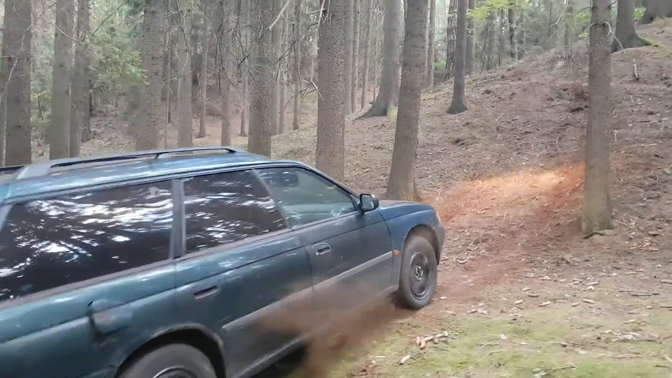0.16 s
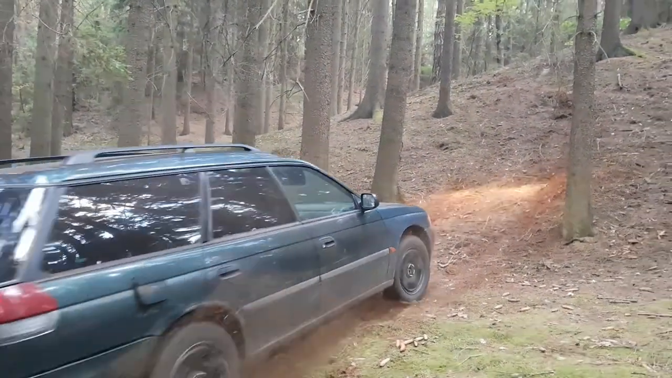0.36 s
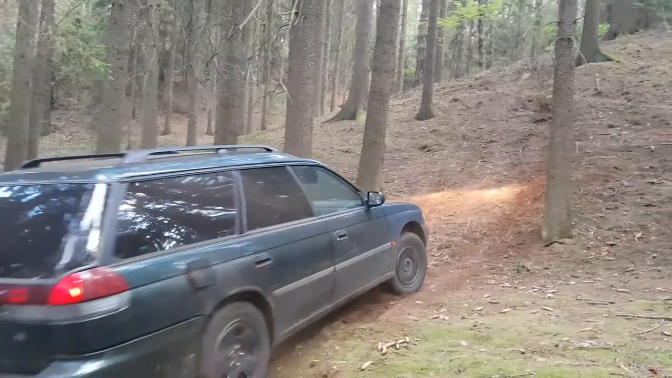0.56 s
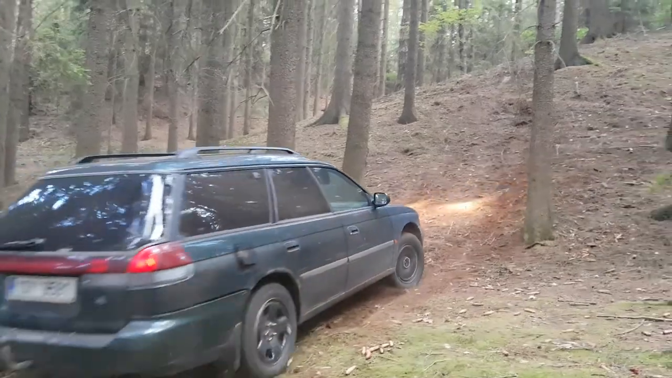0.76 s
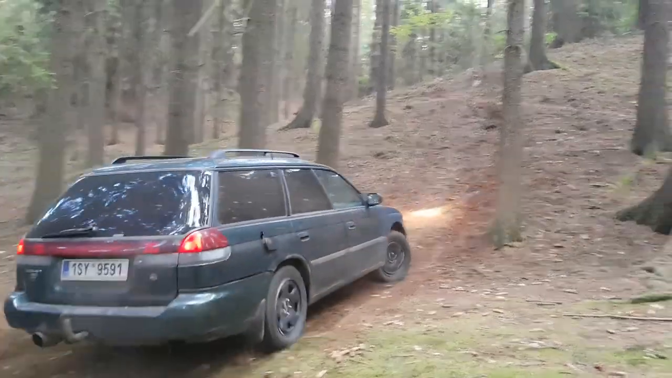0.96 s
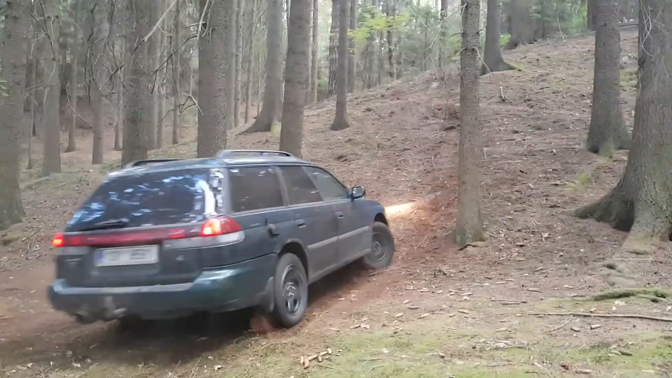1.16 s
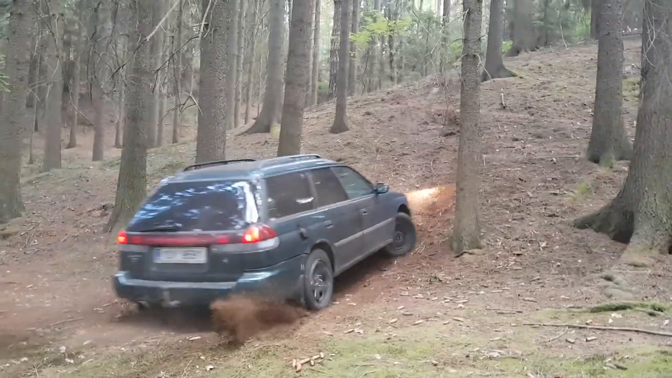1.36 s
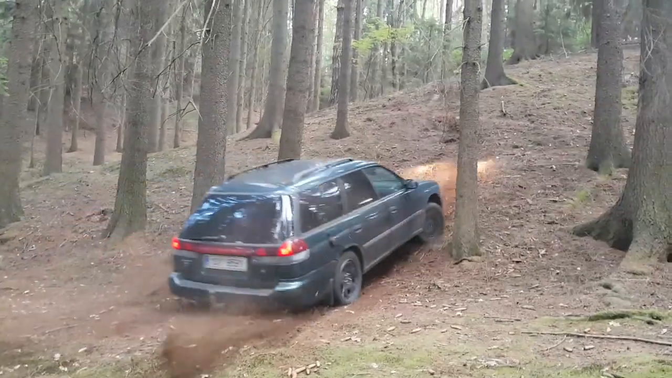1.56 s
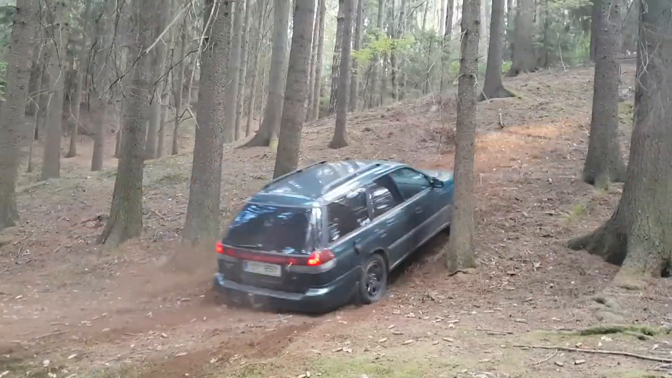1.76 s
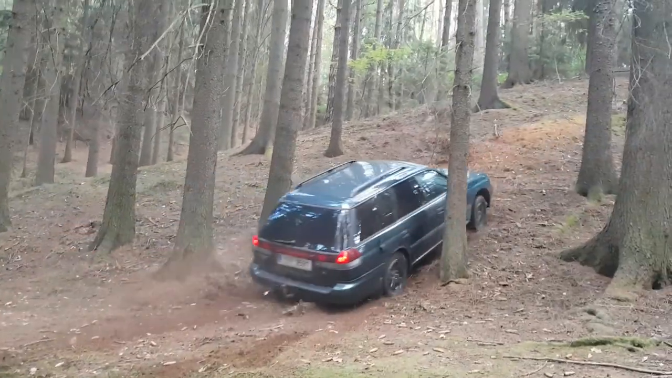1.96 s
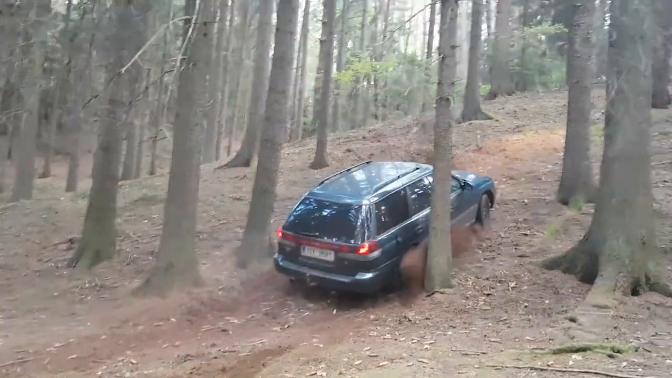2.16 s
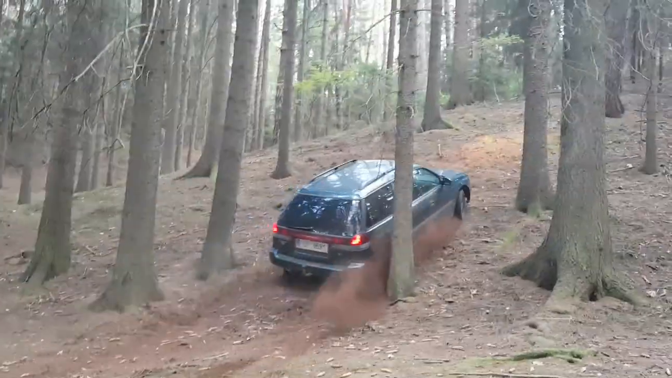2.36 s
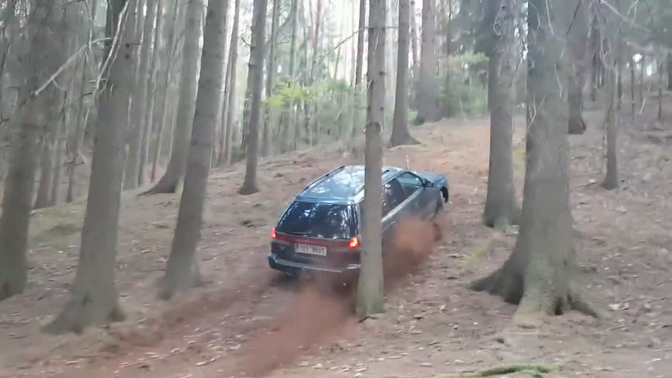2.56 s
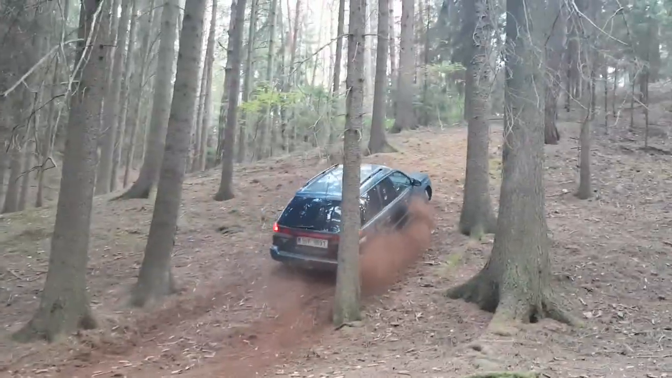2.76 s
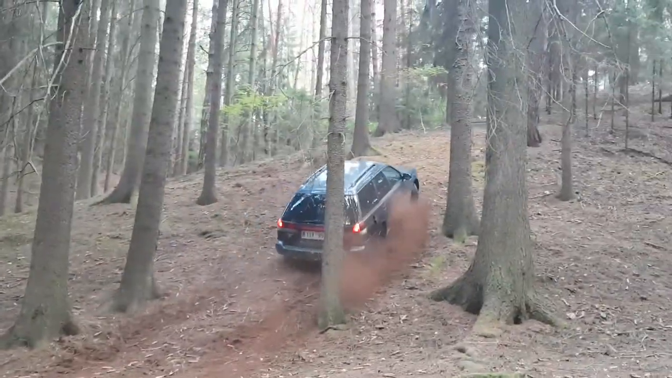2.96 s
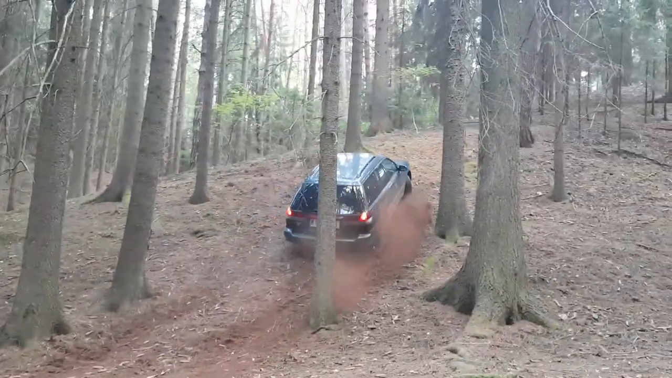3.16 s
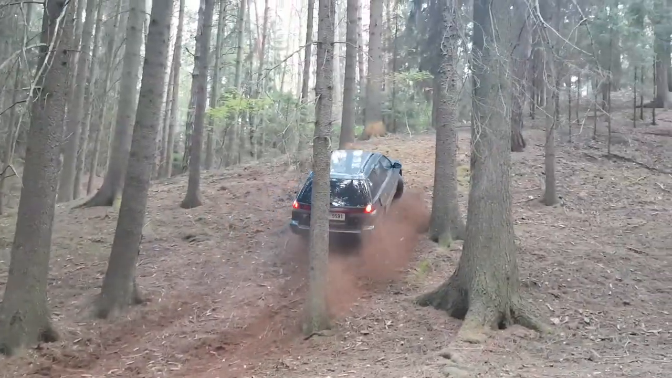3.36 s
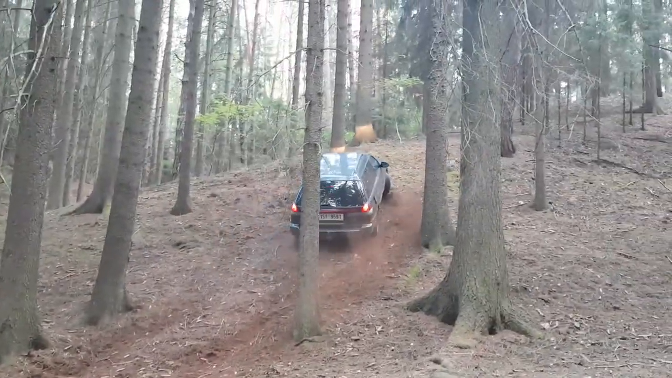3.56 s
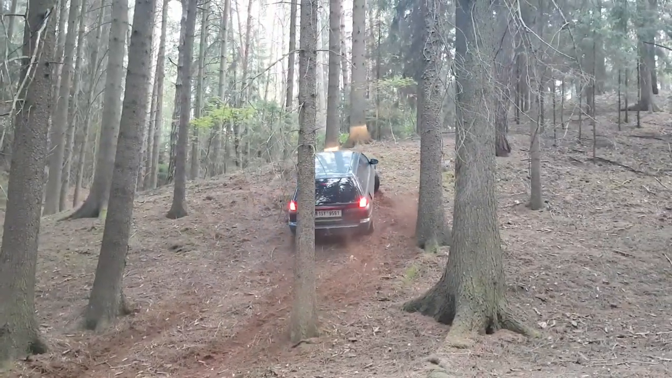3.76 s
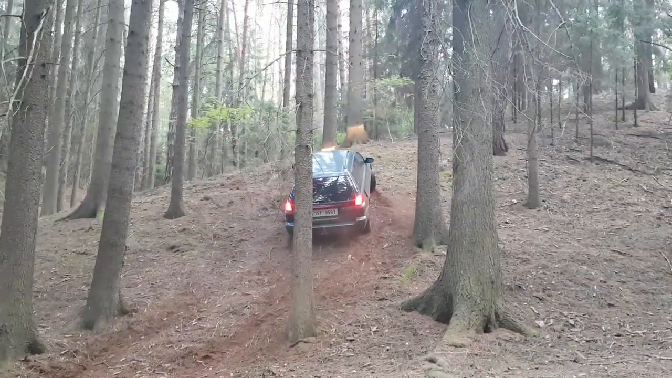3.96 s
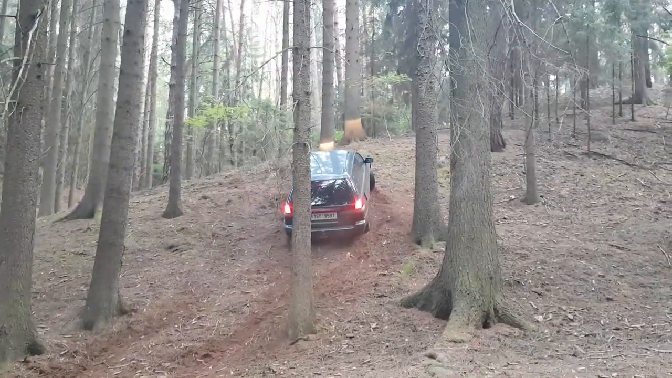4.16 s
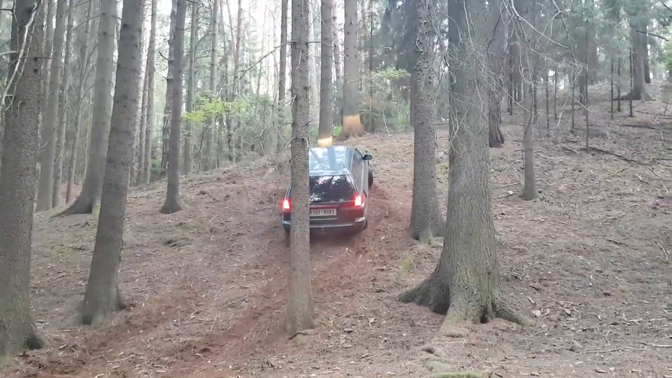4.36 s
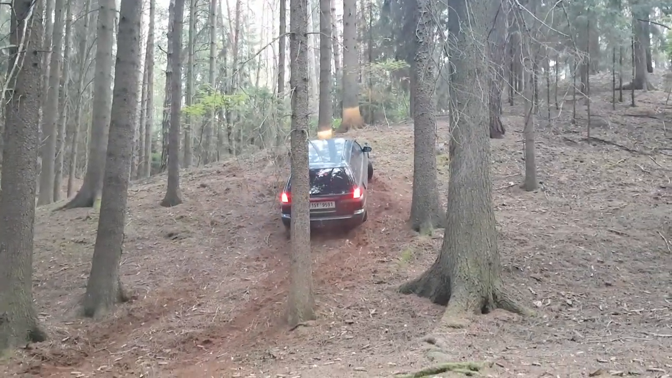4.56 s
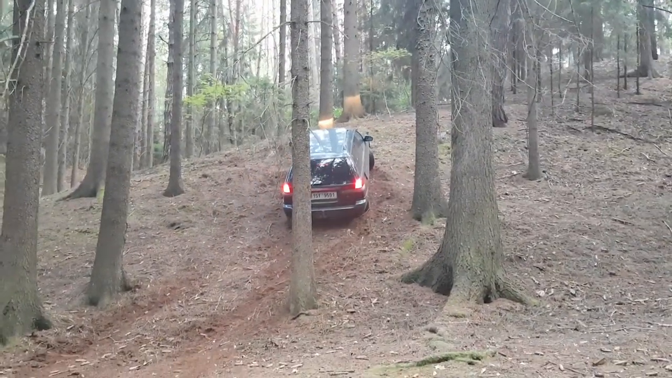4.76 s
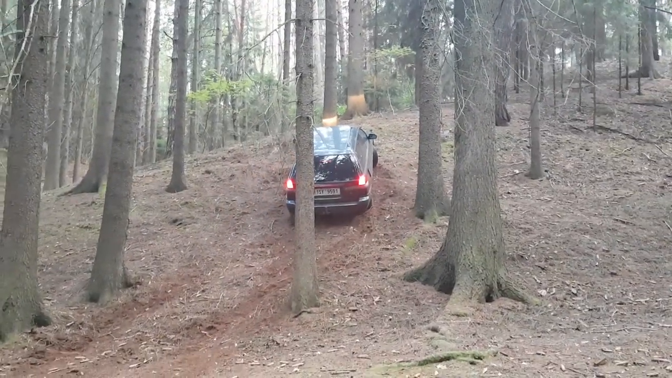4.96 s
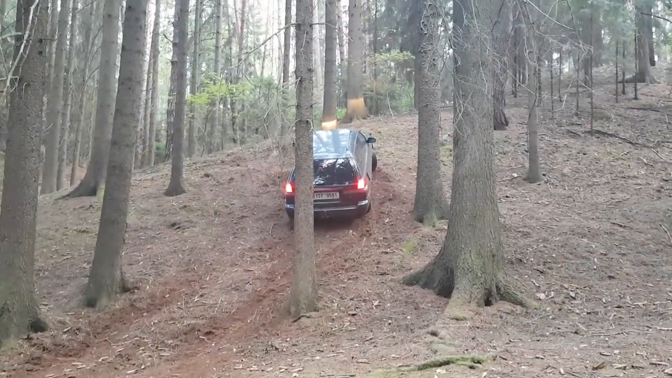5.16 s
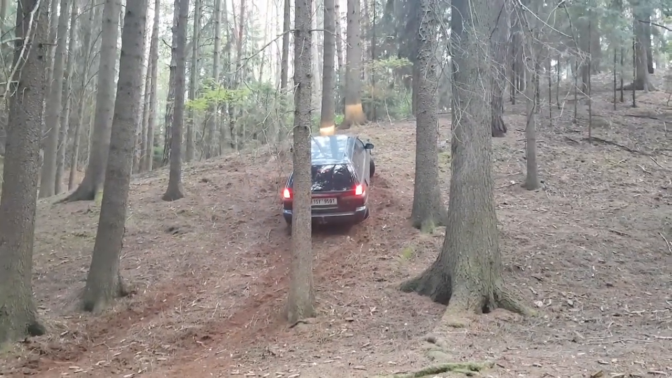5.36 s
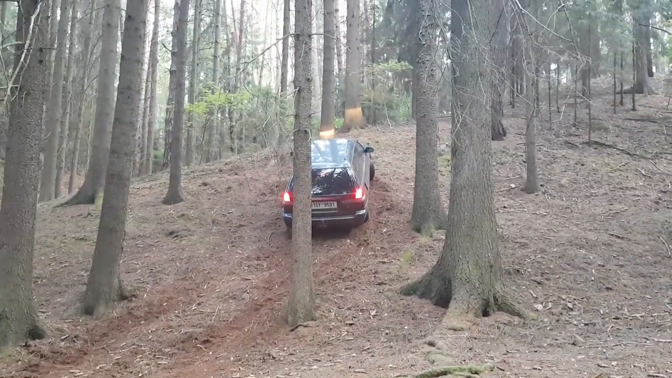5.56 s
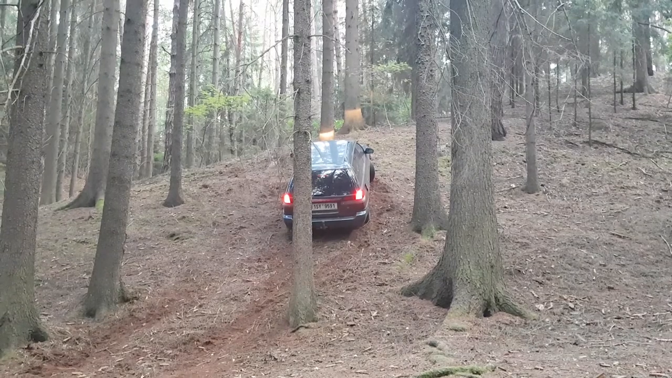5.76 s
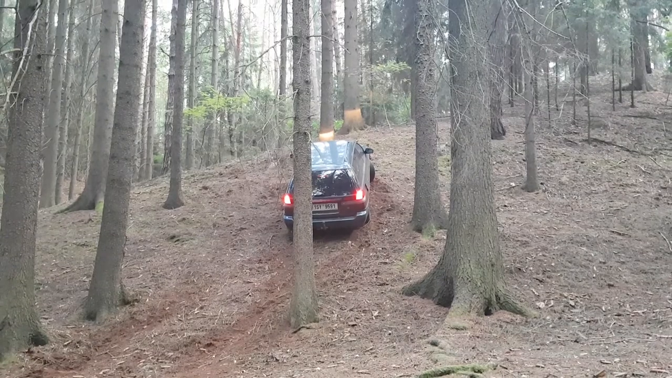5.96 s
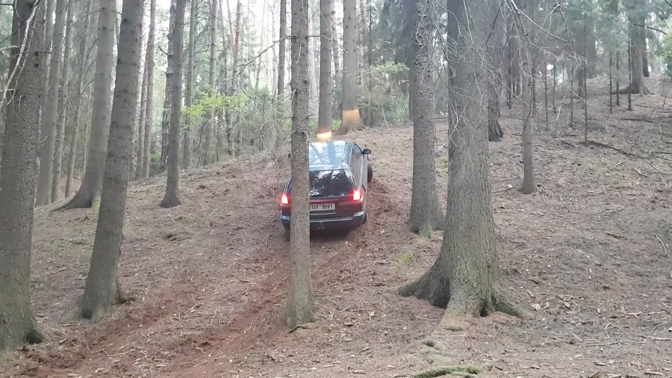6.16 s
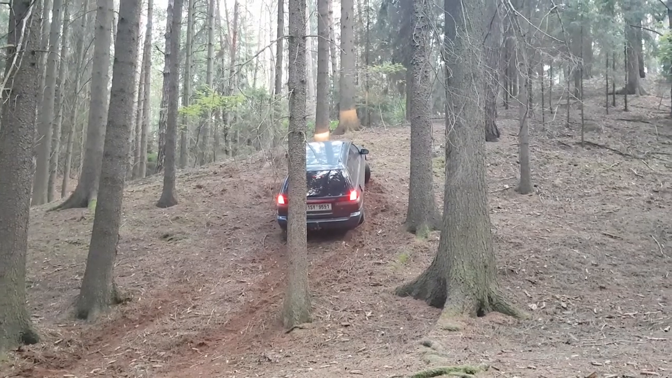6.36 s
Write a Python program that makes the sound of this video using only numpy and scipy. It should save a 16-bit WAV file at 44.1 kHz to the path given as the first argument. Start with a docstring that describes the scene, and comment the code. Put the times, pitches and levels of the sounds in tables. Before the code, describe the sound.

Outdoors among trees, a phone picks up a hard-revving car passing from the left to straight ahead. Deep, uneven exhaust drone, engine-bay roar and hissing dirt dominate, with one very brief lift of the throttle. Then the noise drops away, the pitch slides down, after-fire pops and valve clatter are heard, a faint belt squeak follows, and the engine lugs almost to a stop over faint air hiss.

```python
"""A flat-four estate car charges up a forest slope at full throttle, from the left to straight ahead:
firing harmonics boom and bark while gated noise makes the rasp, the engine-bay roar and wheels spinning in soil.
The foot lifts once for a moment, then the throttle shuts; revs sink as single firings ring the silencer,
with dull pops, sputter, valve clatter and pattering soil, until the engine lugs and barely ticks over.
A phone's two microphones hear it over a faint hiss of air, with a short echo from the trunks."""
import sys
import numpy as np
from scipy import signal
from scipy.fft import rfft, irfft, next_fast_len
from scipy.io import wavfile
from scipy.ndimage import uniform_filter1d, map_coordinates

SR = 44100
rng = np.random.default_rng(int(sys.argv[2]) if len(sys.argv) > 2 else 0)


def unload_audio(sound):
    """Save the sound as a 16-bit wav file, at the path given as the first command line argument."""
    columns = np.transpose(np.atleast_2d(sound))
    # keep every value between -1 and 1, then stretch to whole-number steps
    steps = np.round(np.clip(columns, -1, 1) * 32767)
    wavfile.write(sys.argv[1], SR, steps.astype(np.int16))


N = 282681
T = np.arange(N) / SR

# Engine speed in the charge and the run-down. Each row: time in seconds, four-stroke cycles per second
# in Hz; there are four firings a cycle.
CHARGE = [(0.0, 39.8), (0.37, 43.6), (0.59, 43.9), (0.89, 46.2), (1.24, 44.8), (1.32, 45.5), (1.51, 45.0),
          (1.66, 47.3), (1.77, 47.8), (1.99, 51.2), (2.45, 47.9), (2.67, 45.3), (3.05, 43.8), (3.2, 42.6)]
RUN_DOWN = [(3.3, 39.9), (3.6, 28.2), (4.03, 23.5), (4.18, 23.2), (4.8, 16.7), (4.92, 16.6), (5.22, 13.2),
            (5.75, 9.4), (6.2, 6.4), (6.41, 5.8)]
# Throttle. Each row: time in seconds, opening from 0 to 1.
THROTTLE = [(0, 0.99), (3.22, 1), (3.27, 0.3), (4.55, 0), (4.9, 0), (5.48, 0.16), (5.53, 0)]
# Cylinders in firing order. Each row: strength in dB, full header delay in ms.
CYLINDERS = [(-1, 0.2), (-2.5, 0.042), (-2, 0.62), (-3.5, 0.92)]
# Exhaust tone under load; the quarters come from unequal headers. Each row: multiple of the firing rate,
# level in dB relative to its neighbours around the same harmonic.
TONE = [(0.25, -55), (0.5, -20.5), (0.75, -7.3), (1, 0.5), (1.25, -22.5), (1.5, -22.0), (1.75, -26),
        (2, -18.0), (2.25, -35.5), (2.5, -32), (2.75, -26.5), (3, -21.5), (3.25, -28.5)]
# Bark of the open throttle. Each row: time in seconds, second firing harmonic in dB, third in dB.
BARK = [(0.0, -16, -28.5), (0.3, -21, -38), (1.2, -23.5, -48.5), (1.58, -24.5, -27), (2.02, -25, -26),
        (2.5, -32.5, -47), (3.18, -28.5, -37.5), (3.5, -42, -44.5)]
# Clean overtones as the revs turn and sink. Each row: time in seconds, second firing harmonic in dB,
# fourth in dB.
OVERTONES = [(3.0, -68, -55), (3.15, -64.5, -27), (3.23, -67, -28.5), (3.28, -44, -48.5), (3.39, -35, -30),
             (3.55, -30.5, -46), (3.88, -22, -56.5), (3.98, -72, -78)]
# Noise under power, until the throttle shuts; the foot's dips come on top. Each row: time in seconds,
# pipe rasp in dB, engine-bay roar in dB, tyre scrub in dB.
EFFORT = [(0.0, -33.5, -31.5, -36), (0.35, -25, -27.5, -30.5), (0.68, -27.5, -30, -28),
          (0.92, -21, -29.5, -28.5), (1.5, -27.5, -32.5, -29), (1.85, -32, -32, -34), (2.08, -34, -28, -27),
          (2.33, -27.5, -25.5, -30), (3.05, -26.5, -30.5, -33.5), (3.21, -29.5, -36.5, -41),
          (3.28, -37, -32.5, -41)]
# The wheels dig in and throw up soil. Each row: time of the height in seconds, half length in seconds,
# boost in dB (dust takes all of it, coarse soil a share).
THROWS = [(0.76, 0.31, 5), (1.115, 0.077, 6.5), (1.34, 0.025, 6), (1.62, 0.09, 7), (1.858, 0.18, 8.5),
          (2.418, 0.21, 4)]
# After-fire in the silencer. Each row: time in seconds, relative level of the pipe's ring in dB,
# relative level of the thump in dB.
POPS = [(3.241, -24, -15.5), (3.284, -22, -6.5), (3.914, -23, -10.5), (3.933, -38, -9), (4.03, -29, -10.5),
        (4.091, -24, -3.5), (4.159, -38.5, -10.5), (4.247, -37, -8), (4.528, -25.5, -4),
        (4.623, -36.5, -17.5), (4.804, -45, -17)]
# Sharp clicks and a dull knock. Each row: time in seconds, peak in dB before colouring, ring in Hz,
# decay in seconds.
CLICKS_AND_KNOCKS = [(3.6198, -13, 700, .0001), (3.996, -34.5, 1160, 0.0047), (3.997, -31.5, 2560, 0.0066)]
# A spinning tyre digs itself a rut and its hiss sinks. Each row: time in seconds, centre in Hz, level in dB.
RUT = [(1.9, 5200, -52), (2.02, 4100, -33), (2.12, 2688, -35), (2.33, 1507, -32), (2.56, 1203, -41)]
# The suspension thuds over roots. Each row: time in seconds, half length in seconds, level in dB.
THUDS = [(0.1, .08, -36), (2.03, .025, -31), (2.609, 0.026, -28.5)]
# The last crumbs patter down. Each row: time in seconds, level in dB.
PATTER = [(3.2, -67), (3.8, -67.5), (4.25, -72.5), (4.9, -85.5)]
# A brief belt squeak as the revs collapse. Each row: time in seconds, pitch in Hz, level in dB.
SQUEAK = [(5.49, 1700, -100), (5.52, 1730, -59), (5.66, 1650, -62), (5.78, 1570, -78)]
# Bearing of the car. Each row: time in seconds, delay to the right microphone in ms,
# delay of a second path around the phone's body in ms.
BEARING = [(0, 0.27, 0.14), (.6, 0.25, .16), (1.1, 0.18, 0.17), (1.6, 0.073, 0.23), (2.1, 0.0096, 0.25),
           (3.2, 0.0022, 0.24)]
# The left microphone against the right. Each row: frequency in Hz, difference in dB.
PORTS = [(60, -0.5), (110, -1.5), (200, -1.0), (380, -0.5), (700, 1), (1290, 2), (2380, 9), (4400, 2.5),
         (8120, 2), (15000, 9.5)]

# Tone colours of the sources. Each row: frequency in Hz, gain in dB.
SILENCER = [(25, -33), (42, -10.5), (54, -16), (72, 3), (92, 1.5), (112, 6), (140, 4), (165, -2.5),
            (190, -12.5), (240, -20.5), (290, -60), (350, -65), (430, -53), (520, -61.5), (590, -37.5),
            (760, -59.5), (1500, -92.5)]
TAILPIPE = [(240, -5), (340, -24), (430, -3), (500, -8), (585, 5.5), (680, -4), (850, -15.5), (1400, -51)]
RASP = [(250, -36.5), (430, -5), (540, 5.5), (660, 13.5), (780, 13.5), (950, 5.5), (1400, -36)]
ROAR = [(450, -40.5), (800, -2), (1050, 9), (1400, 6.5), (1850, 0.5), (2700, -38)]
CLATTER = [(500, -14), (820, -7.5), (1020, 7.5), (1300, -0.5), (1800, 1), (2800, -6.5), (3800, -15.5),
           (5500, -21.5), (8000, -26), (10000, -34)]
SCRUB = [(1200, -14.5), (1900, 0), (2500, 1), (3100, -3.5), (4000, -8.5), (5200, -18), (8000, -44)]
SOIL = [(2800, -23), (4700, 9), (6300, 9.5), (7900, 5.5), (9300, -10.5), (12000, -30.5)]
DUST = [(7000, -33), (9500, -4), (12500, -4.5), (15500, -5.5)]
AIR = [(30, 7.5), (150, 11.5), (260, 18), (330, 21), (420, 16), (1000, 10.5), (2500, 11.5), (4500, 2.5),
       (9000, -4.5), (12500, 2), (15500, 1)]
GAS = [(20, -16), (50, -13.5), (90, -10.0), (170, 2.5), (260, -9), (340, -24), (450, -17),
       (900, -44.0), (3000, -80.0)]
POP_RING = [(120, 0), (210, 8), (340, -10), (430, 0), (500, -3), (610, 10), (740, -7.5),
            (1100, -22), (3000, -30.5), (8000, -54.5)]
SPUTTER_RING = [(150, -8), (235, 17), (340, -18), (450, 2), (600, -4.5), (900, -18.5),
                (2000, -35.5), (8000, -80)]
RUMBLE = [(20, -15), (42, -3), (80, 3), (120, -7), (250, -40.5), (1000, -90)]
FOREST_FLOOR = [(2000, -20), (4000, -3), (7500, 0), (9500, -13.5), (15000, -19.5)]
CLICK_COLOUR = [(700, 8), (3000, -4), (6000, -7), (12000, -11)]
TRUNKS = [(150, -8.0), (400, -2.0), (1500, 5.5), (4000, 2), (12000, -8.5)]

# the driver's foot: one brief lift, then the throttle shuts, and at last the engine all but stalls
LIFT_S, SHUT_S, STALL_S = 2.61, 3.23, 5.492
# exhaust boom under power; it weakens once the revs climb past the silencer's pass band
LOAD_DB, CHOKE_HZ, CHOKE_DB_PER_HZ = -8.5, 45.3, 0.39
# off the throttle the levels sink with the revs, counted in octaves from this speed
COAST_HZ = 40.25
COAST_BOOM_DB, BOOM_DB_PER_OCTAVE = -5, 5.5
RING_DB, RING_DB_PER_OCTAVE, RING_THROTTLE_DB = -43.5, 6.5, 21.5
CLATTER_DB, CLATTER_DB_PER_OCTAVE = -42.5, 9.5
STALL_BOOM_DB, STALL_FADE_DB_PER_S, STALL_CLATTER_DB = -8.5, -8.5, -2
# around this speed the fuel is cut on the overrun and the cylinders pump alike
FUEL_CUT_HZ, FUEL_CUT_WIDTH_HZ = 31, 4.3
# flying soil and fine dust: offset in dB, and dB gained per dB of tyre scrub
SOIL_DB, SOIL_FOLLOW = -25.5, 0.69
DUST_DB, DUST_FOLLOW = -23, 0.97
# the tyres find grip just before the throttle shuts, and less soil flies
GRIP_S, GRIP_TAKES_S, GRIP_DB = 3.06, .2, -6
# faint sputtering between the pops
SPUTTER_FROM_S, SPUTTER_TO_S, SPUTTER_DB = 3.9, 4.7, -43
# the tailpipe's upper resonance, which picks out the fifth firing harmonic
WHINE_HZ, WHINE_WIDTH_HZ, WHINE_DB = 800, 43, -30.5
FOREST_T60_S, FOREST_DB = 0.61, -13.5
AIR_DB = -71.5
TOP_HZ = 15750


def undb(db):
    """Decibels to gain."""
    return np.exp(np.log(10) / 20 * np.asarray(db))


def curves(table):
    """Every column of a table of (s, ..) rows, sample by sample."""
    s, *columns = np.transpose(table)
    return [np.interp(T, s, c) for c in columns]


def swell(s, half_s):
    """A smooth rise to 1 and back around a moment."""
    return np.exp(-np.minimum(((T - s) / half_s) ** 2, 20))


def ramp(s, seconds):
    """A rise from 0 to 1 that starts at a moment."""
    return np.clip((T - s) / seconds, 0, 1)


def colour(x, points):
    """Causal minimum-phase filter with a response of (Hz, dB) points."""
    size = 8192
    hz, db = np.transpose(points)
    gain = undb(np.interp(np.log(np.fft.rfftfreq(size, 1 / SR) + 1), np.log(hz), db))
    # folding the cepstrum onto positive time gives the minimum phase
    cepstrum = irfft(np.log(gain))
    cepstrum[1:size // 2] *= 2
    cepstrum[size // 2 + 1:] = 0
    response = irfft(np.exp(rfft(cepstrum)))
    padded = next_fast_len(N + size, True)
    spectrum = rfft(np.float32(x), padded) * rfft(np.float32(response), padded)
    return irfft(spectrum, padded)[..., :N].astype(float)


def steady(x, size=4400):
    """Unit rms over a sliding window, ready for a level curve."""
    mid = np.atleast_2d(x).mean(axis=0)
    power = uniform_filter1d(uniform_filter1d(mid ** 2, size), size)
    return x / np.sqrt(np.abs(power) + 1e-14)


def walk(rate):
    """Smooth random motion of unit spread, with about this many new targets a second."""
    k = max(int(SR / rate), 1)
    steps = np.repeat(rng.standard_normal(N // k + 2), k)
    motion = uniform_filter1d(steps, k)[:N]
    return motion / motion.std()


def pair(alike):
    """Noise at two microphones, with a share common to both."""
    alike = np.clip(alike, 0, 1)
    common = rng.standard_normal(N)
    return np.sqrt(alike) * common + np.sqrt(1 - alike) * rng.standard_normal((2, N))


def clicks(times, sizes):
    """Impulses, each shared between two neighbouring samples."""
    place = np.clip(np.asarray(times) * SR, 0, N - 2)
    i = place.astype(int)
    return np.bincount(i, sizes * (1 - place + i), N) + np.bincount(i + 1, sizes * (place - i), N)


def puff(blows, decay_s):
    """Bursts of gas: each blow starts a decaying envelope."""
    return signal.lfilter([1], [1, -np.exp(-1 / (decay_s * SR))], blows + 1e-18)


def delayed(x, ms, order=3):
    """A fixed or moving delay; first order is slightly duller."""
    place = (T - ms / 1000) * SR
    return np.apply_along_axis(lambda row: map_coordinates(row, [place], order=order), -1, x)


def gritty(count, alike, grain_db, spread):
    """A hiss with the ticks of many crumbs and needles in it, a few large among many small."""
    times = rng.random(count) * T[-1]
    sizes = undb(spread * np.minimum(rng.exponential(size=count), 4)) * rng.choice([-1, 1], count)
    grains = np.array([clicks(times, sizes * (1 + .5 * rng.standard_normal(count))) for _ in range(2)])
    return pair(alike) + undb(grain_db) * grains / grains.std()


def air():
    """A steady coloured hiss, nearly independent at the two microphones."""
    return undb(AIR_DB) * steady(colour(pair(.1), AIR))


def forest(x):
    """Scattered echoes from the trunks decay as noise; the last slow beats linger a little."""
    age = T[:SR]
    tails = rng.standard_normal((2, SR)) * undb(-60 * age / FOREST_T60_S) * (age > .015)
    tails /= np.sqrt((tails ** 2).sum(axis=1, keepdims=True))
    wet = signal.fftconvolve(x, tails, axes=1)[:, :N]
    late = 0.2 * delayed(x, 11.0, order=1) + 0.33 * delayed(x, 20.0, order=1)
    return ramp(STALL_S, 0.11) * late + undb(FOREST_DB) * colour(wet, TRUNKS)


def patter():
    """Thrown soil and needles fall back on the forest floor in uneven flurries."""
    db, = curves(PATTER)
    grains = colour(gritty(count=1200, alike=.3, grain_db=-1.5, spread=3), FOREST_FLOOR)
    falling = ramp(SHUT_S, .05) * (1 - ramp(PATTER[-1][0], .2))
    return falling * steady(grains) * undb(db + 2.5 * walk(14))


def clicks_and_knocks():
    """Sharp clicks and a dull knock: an edge and a short noise burst excite a resonance."""
    out = 0
    for s, db, hz, decay_s in CLICKS_AND_KNOCKS:
        age = np.maximum(T - s, 0)
        roughness = 1 + 30 * np.sqrt(age) * rng.standard_normal(N)
        burst = (T >= s) * np.exp(-np.minimum(age / decay_s, 20)) * roughness
        width_hz = min(0.91 / decay_s, 5000)
        click = signal.lfilter(*signal.iirpeak(hz, hz / width_hz, fs=SR), burst)
        out = out + undb(db) * click / np.abs(click).max()
    return colour(out, CLICK_COLOUR)


def thuds():
    """Short low rumbles of the body on its springs."""
    rumble = colour(rng.standard_normal(N), RUMBLE)
    level = sum(undb(db) * swell(s, half_s) for s, half_s, db in THUDS)
    return rumble / rumble.std() * level


def squeak():
    """A thin, unsteady falling whistle of the belt."""
    hz, db = curves(SQUEAK)
    sounding = (T > SQUEAK[0][0]) & (T < SQUEAK[-1][0])
    phase = 2 * np.pi * np.cumsum(hz + 12 * walk(120)) / SR
    return sounding * undb(db + 2.8 * walk(50)) * np.sin(phase)


def rut(width_hz):
    """A band of hiss that slides down as the tyre sinks into the soil."""
    hz, db = curves(RUT)
    # low noise multiplied by a sliding carrier
    band = signal.sosfilt(signal.butter(2, width_hz / 2, fs=SR, output="sos"), pair(.7))
    digging = (T > RUT[0][0]) & (T < RUT[-1][0])
    return digging * undb(db) * steady(band * np.cos(2 * np.pi * np.cumsum(hz) / SR))


def effort_levels(lift_db, lift_lag_s, lift_half_s, shut_db, soil_throw):
    """Rasp, roar, scrub, soil and dust in dB; all duck when the foot lifts and drop when the throttle shuts."""
    rasp, roar, scrub = curves(EFFORT)
    thrown = sum(db * swell(s, half_s) for s, half_s, db in THROWS)
    gripping = GRIP_DB * ramp(GRIP_S, GRIP_TAKES_S)
    soil = gripping + SOIL_DB + SOIL_FOLLOW * scrub + soil_throw * thrown
    dust = gripping + DUST_DB + DUST_FOLLOW * scrub + thrown
    foot = lift_db * swell(LIFT_S + lift_lag_s, lift_half_s) + shut_db * ramp(SHUT_S, 0.027)
    return np.array([rasp, roar, scrub, soil, dust]) + foot


def firing_beat(cycle, throb):
    """Log gain that throbs once a firing."""
    return throb * np.cos(2 * np.pi * (4 * cycle - .2))


def churn(cycle, fronts, throb, ring_share, echo_left, echo_right):
    """Gas rasps once a firing, the engine bay roars and the spinning tyres tear at the ground."""
    rasp_db, roar_db, scrub_db, soil_db, dust_db = effort_levels(
        lift_db=-10.5, lift_lag_s=.016, lift_half_s=0.061, shut_db=-5.5, soil_throw=0.5)
    gate = np.exp(firing_beat(cycle, throb) + .25 * np.cos(2 * np.pi * cycle))
    grip = walk(45)
    rasp = ring_share * steady(colour(fronts, RASP)) + steady(colour(pair(0.84) * gate, RASP))
    roar = steady(colour(pair(0.71) * gate ** .5, ROAR)) * undb(roar_db + 0.86 * grip)
    tearing = gritty(count=2600, alike=0.7, grain_db=-6, spread=3.9)
    scrub = steady(colour(tearing * gate ** .5, SCRUB)) * undb(scrub_db + 1.15 * grip)
    # flying soil is heard directly and again around the phone's body, mostly on the left
    spray = gritty(count=9000, alike=0.17, grain_db=-2, spread=3.8) * undb(1.3 * walk(35))
    second_path_ms = curves(BEARING)[1]
    spray = spray + np.array([[echo_left], [echo_right]]) * delayed(spray, second_path_ms)
    soil = steady(colour(spray, SOIL)) * undb(soil_db)
    dust = steady(colour(spray, DUST)) * undb(dust_db)
    spinning = 1 - ramp(SHUT_S, .2)
    return spinning * (steady(rasp) * undb(rasp_db) + roar + scrub + soil + dust)


def overrun_levels(hz):
    """Tailpipe ring and clatter in dB: both sink with the revs; a touch of throttle lifts the ring."""
    octaves = np.log2(hz / COAST_HZ)
    throttle, = curves(THROTTLE)
    ring = RING_DB + RING_DB_PER_OCTAVE * octaves + RING_THROTTLE_DB * np.minimum(throttle, .3)
    clatter = CLATTER_DB + CLATTER_DB_PER_OCTAVE * octaves + STALL_CLATTER_DB * ramp(STALL_S, 0.065)
    return ring, clatter


def overrun(cycle, hz, fronts, throb, ring_share):
    """With the wheels gripping again, the tailpipe rings and the valves clatter, throbbing with the firings."""
    ring_db, clatter_db = overrun_levels(hz)
    gate = np.exp(firing_beat(cycle, throb))
    ring = ring_share * steady(colour(fronts, TAILPIPE)) + steady(colour(pair(0.99) * gate, TAILPIPE))
    clatter = steady(colour(pair(0.51) * gate ** 0.48, CLATTER)) * undb(clatter_db + 0.77 * walk(40))
    return ramp(SHUT_S, .09) * (steady(ring) * undb(ring_db) + clatter)


def sputter(count, scatter_db, decay_s):
    """Small puffs of unburnt fuel ring the tailpipe's lower resonances."""
    times = rng.uniform(SPUTTER_FROM_S, SPUTTER_TO_S, count)
    blows = clicks(times, undb(scatter_db * rng.standard_normal(count)))
    ring = colour(puff(blows, decay_s) * rng.standard_normal(N), SPUTTER_RING)
    sputtering = (T > SPUTTER_FROM_S) & (T < SPUTTER_TO_S)
    return undb(SPUTTER_DB) * ring / ring[sputtering].std()


def after_fire(ring_db, thump_db, decay_s, kick):
    """Unburnt fuel pops: a thump in the silencer, and a kick and a gust of gas that ring the tailpipe."""
    s, ring, thump = np.transpose(POPS)
    body = colour(clicks(s, undb(thump)), SILENCER)
    body *= undb(thump.max() + thump_db) / np.abs(body).max()
    blows = clicks(s, undb(ring))
    gust = puff(blows, decay_s) * rng.standard_normal(N)
    pipe = colour(kick * blows + gust, POP_RING)
    return body + undb(ring_db) * pipe


def stumble(depth, seconds):
    """Each after-fire robs the next firing or two of their strength: a brief dip in gain."""
    age = np.clip((T - np.array(POPS)[:, :1]) / seconds, 0, 20)
    return np.prod(1 - np.clip(depth, 0, 1) * age * np.exp(1 - age), axis=0)


def overtones(cycle, hz):
    """Single harmonics of the firing rate sing as they slide through the pipe's resonances."""
    second_db, fourth_db = curves(OVERTONES)
    turn = 2 * np.pi * 4 * cycle
    second, fourth, fifth = (np.sin(k * turn) for k in (2, 4, 5))
    sounding = (T > OVERTONES[0][0]) & (T < OVERTONES[-1][0])
    # the fifth harmonic lies at 20 times the cycle rate
    resonance = np.exp(-((20 * hz - WHINE_HZ) / WHINE_WIDTH_HZ) ** 2)
    whine = resonance * (1 - ramp(SHUT_S, .03)) * undb(WHINE_DB + 3.3 * walk(40))
    singing = undb(second_db) * second + undb(fourth_db + 1.5 * walk(46)) * fourth
    return sounding * singing + whine * fifth


def firings(cycle, hz, scatter_db, stumble_db, jitter_ms, headers):
    """One pulse a cylinder, late by a share of its header delay; combustion grows uneven near a stall."""
    k = np.arange(int(4 * cycle[-1]))
    times = np.interp(k / 4, cycle, T)
    db, delay_ms = np.array(CYLINDERS)[k % len(CYLINDERS)].T
    size_chance, time_chance = rng.standard_normal((len(k), 2)).T
    speed = np.interp(times, T, hz)
    lugging = np.clip((12 - speed) / 3, 0, 1)
    uneven = 1 - np.exp(-((speed - FUEL_CUT_HZ) / FUEL_CUT_WIDTH_HZ) ** 2)
    sizes = undb(uneven * db + (scatter_db + stumble_db * lugging) * size_chance)
    late_ms = uneven * headers * delay_ms + jitter_ms * (1 + 2 * lugging) * time_chance
    return clicks(times + late_ms / 1000, sizes)


def boom_level(hz, lift_db, lift_half_s):
    """Exhaust in dB: choked by high revs under power, sinking with the revs, collapsing near the stall."""
    choke = CHOKE_DB_PER_HZ * np.maximum(hz - CHOKE_HZ, 0)
    loaded = LOAD_DB - choke + lift_db * swell(LIFT_S, lift_half_s)
    stall = ramp(STALL_S, 0.027) * (STALL_BOOM_DB + STALL_FADE_DB_PER_S * (T - STALL_S))
    coasting = COAST_BOOM_DB + BOOM_DB_PER_OCTAVE * np.log2(hz / COAST_HZ) + stall
    return loaded + ramp(SHUT_S, .04) * (coasting - loaded)


def loaded_exhaust(cycle, boom_db, waver_db, flutter_db, jitter):
    """Full throttle: a clean boom on the low orders and a rougher bark around the next two harmonics."""
    groups = np.zeros((3, N))
    turn = 4 * cycle + jitter * walk(71)
    for multiple, db in TONE:
        harmonic = max(int(np.ceil(multiple - .5)), 1)
        unrest_db = waver_db if harmonic == 1 else flutter_db
        level = undb(db + unrest_db * walk(24.85))
        groups[harmonic - 1] += level * np.sin(2 * np.pi * (multiple * turn + rng.random()))
    second_db, third_db = curves(BARK)
    return sum(steady(x) * undb(db) for x, db in zip(groups, (boom_db, second_db, third_db)))


def exhaust(cycle, hz, pulses, gas_db, gas_db_per_octave):
    """The loaded drone gives way to single firings ringing the silencer; gas rumbles along."""
    boom_db = boom_level(hz, lift_db=-7.0, lift_half_s=0.04)
    throttle, = curves(THROTTLE)
    shut = np.clip(2 * (1 - throttle), 0, 1) * np.pi / 2  # angle of an equal-power crossfade
    loaded = loaded_exhaust(cycle, boom_db, waver_db=1.27, flutter_db=2.0, jitter=0.0037)
    # a closed throttle leaves little pressure in the cylinders, so the pulses are rounder
    edge = np.clip(throttle / 0.9, 0, 1)
    soft = signal.filtfilt(*signal.butter(1, 150, fs=SR), pulses)
    coasting = steady(colour(soft + edge * (pulses - soft), SILENCER)) * undb(boom_db)
    octaves_below = np.minimum(np.log2(hz / COAST_HZ), 0)
    gas = steady(colour(rng.standard_normal(N), GAS))
    gas = gas * undb(boom_db + gas_db + gas_db_per_octave * octaves_below)
    return np.cos(shut) * loaded + np.sin(shut) * coasting + gas


def scene():
    """The car, first on the left and then straight ahead, among the trees."""
    hz, = curves(CHARGE + RUN_DOWN)
    cycle = np.cumsum(hz) / SR
    pulses = firings(cycle, hz, scatter_db=.4, stumble_db=1.8, jitter_ms=.15, headers=1)
    # the sharp fronts that ring the tailpipe come almost evenly
    fronts = firings(cycle, hz, scatter_db=1.0, stumble_db=0.5, jitter_ms=0.14, headers=0.28)
    pipe = exhaust(cycle, hz, pulses, gas_db=-18.5, gas_db_per_octave=3.0)
    pipe = pipe * stumble(depth=0.31, seconds=0.011)
    pipe = pipe + after_fire(ring_db=8.5, thump_db=4.0, decay_s=0.017, kick=18)
    pipe = pipe + sputter(count=14, scatter_db=2, decay_s=0.012)
    noise = churn(cycle, fronts, throb=0.4, ring_share=0.82, echo_left=.55, echo_right=.12)
    noise = noise + overrun(cycle, hz, fronts, throb=0.54, ring_share=0.77)
    details = rut(width_hz=1000) + thuds() + patter() + clicks_and_knocks() + squeak()
    car = pipe + overtones(cycle, hz) + noise + details
    right_delay_ms = curves(BEARING)[0]
    car = np.array([car[0], delayed(car[1], right_delay_ms)])
    return car + forest(car) + air()


def record(dry):
    """Each microphone has its own colour; the phone rounds the highest peaks and cuts the top."""
    # half the difference goes to each side
    left = colour(dry[0], [(hz, db / 2) for hz, db in PORTS])
    right = colour(dry[1], [(hz, -db / 2) for hz, db in PORTS])
    ports = np.array([left, right])
    rounded = ramp(0, .004) * ports / (1 + ports ** 8) ** (1 / 8)
    return signal.sosfilt(signal.ellip(10, .2, 80, TOP_HZ, fs=SR, output="sos"), rounded)


dry = scene()
out = record(dry)
unload_audio(out)
```